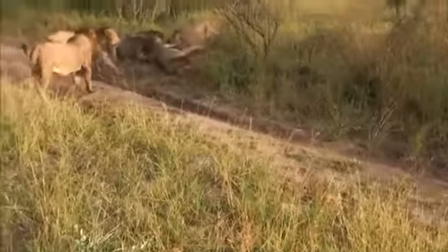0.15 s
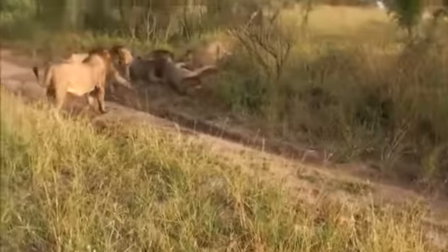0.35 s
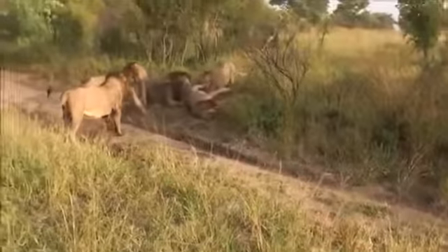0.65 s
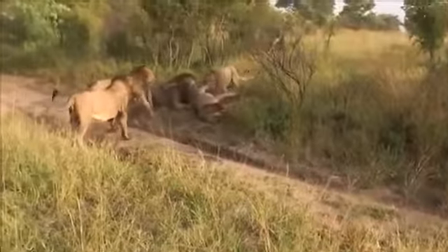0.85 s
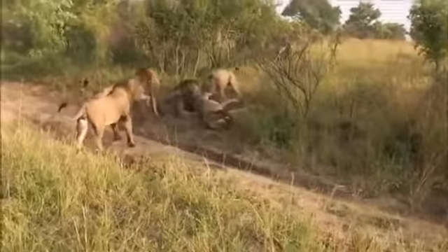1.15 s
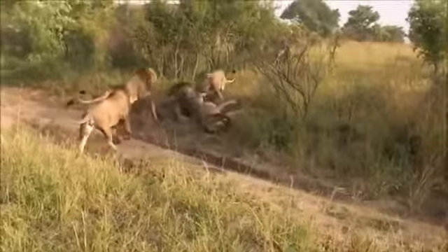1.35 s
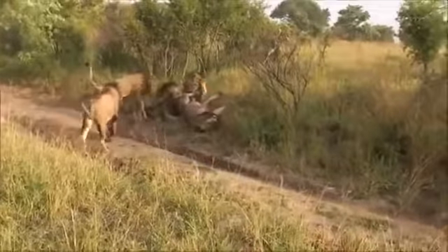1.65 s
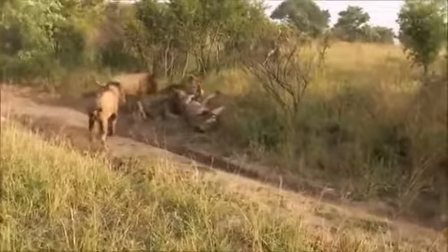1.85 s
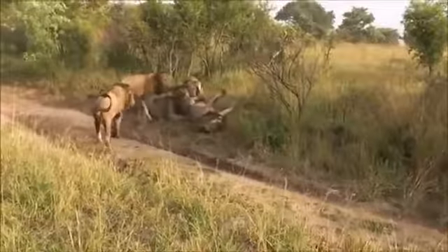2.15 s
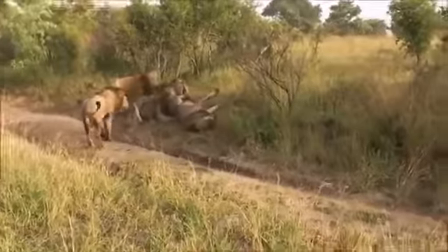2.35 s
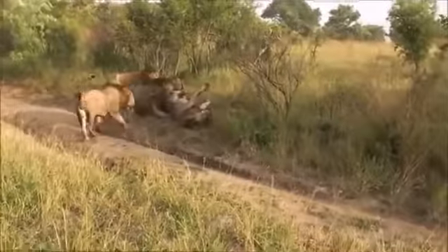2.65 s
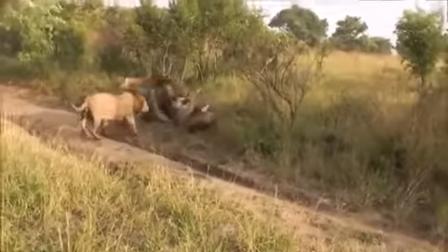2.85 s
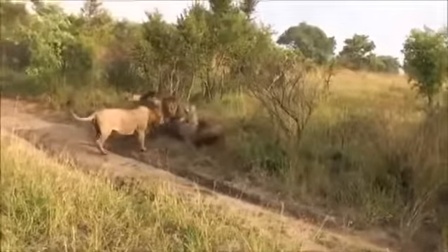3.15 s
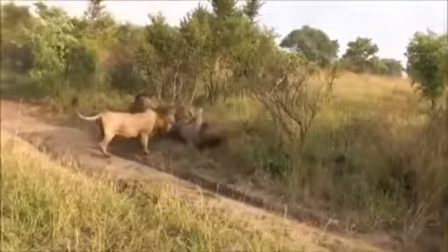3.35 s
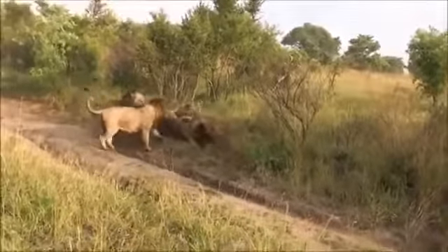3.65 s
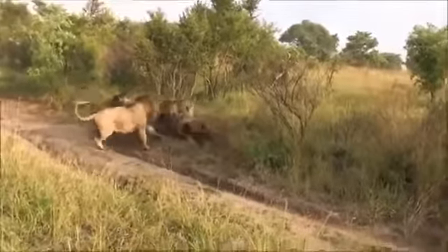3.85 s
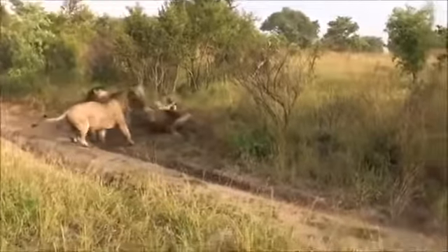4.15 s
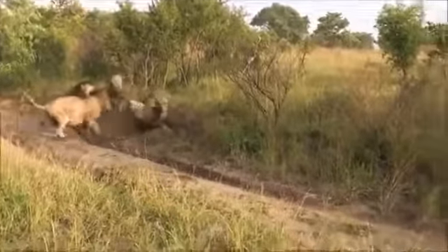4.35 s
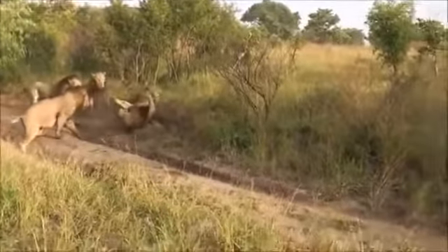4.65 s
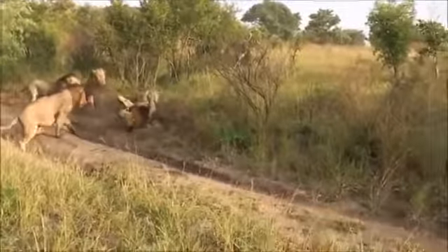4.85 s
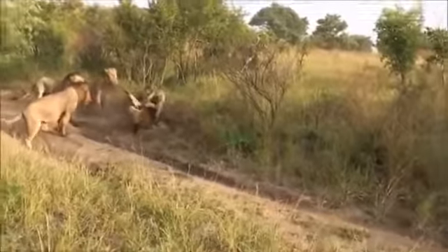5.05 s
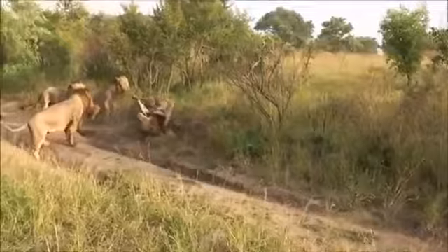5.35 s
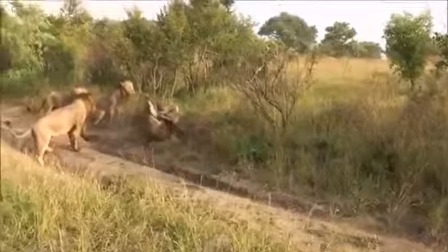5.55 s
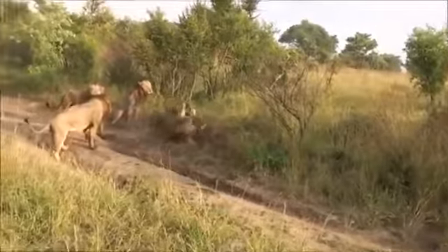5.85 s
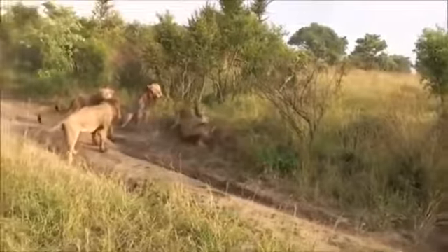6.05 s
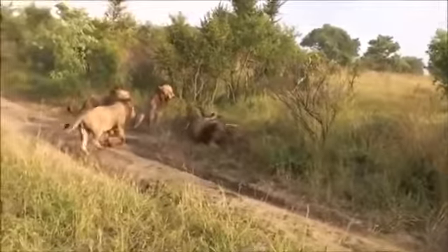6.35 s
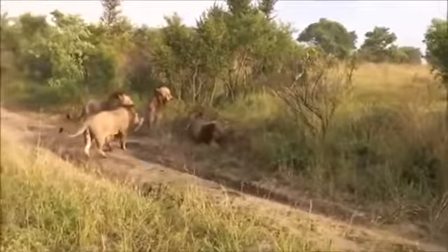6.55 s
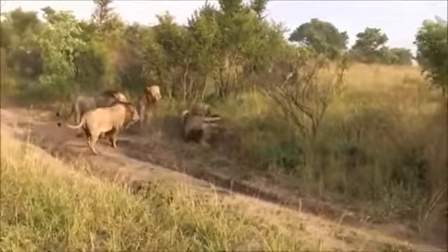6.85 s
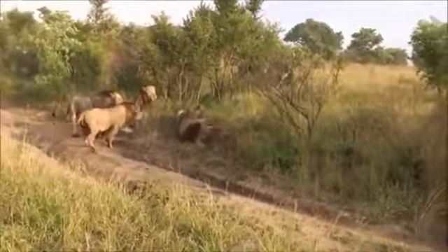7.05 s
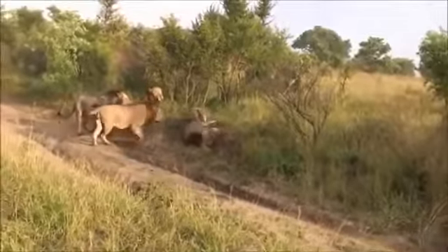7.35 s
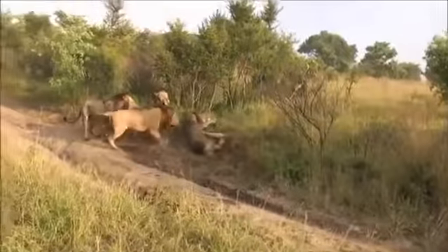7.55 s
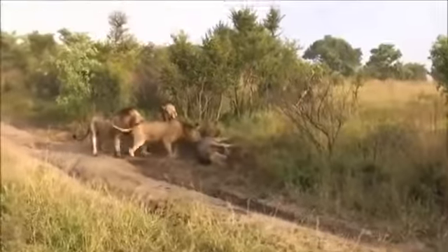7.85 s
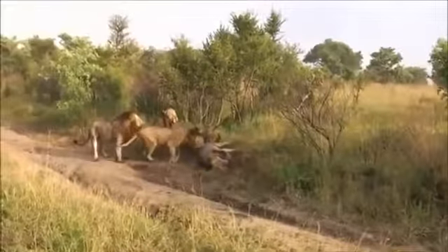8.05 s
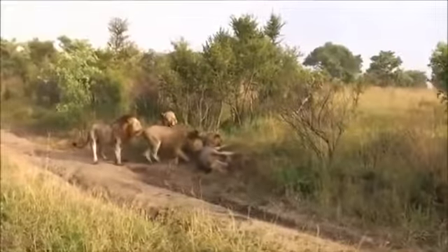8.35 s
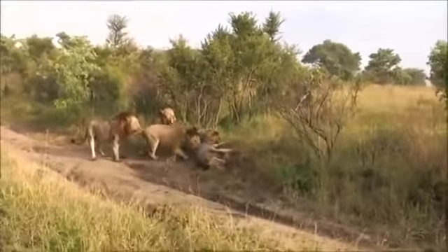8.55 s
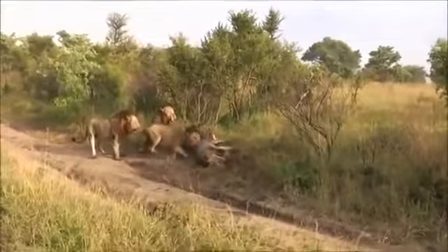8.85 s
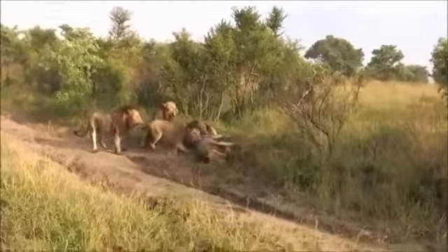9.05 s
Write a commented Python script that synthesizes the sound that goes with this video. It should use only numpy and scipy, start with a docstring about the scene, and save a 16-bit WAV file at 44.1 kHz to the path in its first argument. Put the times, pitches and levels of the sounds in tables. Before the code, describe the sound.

A group of lions fights on a grassy track. A long throaty growl fades, short snarls break in, then a louder growl rises and sinks. A fierce clash follows with moans, hisses and cracking stems. More growling bouts come, a brief lull, then a last sustained growl. Open outdoor air, faint distant birds, lions central and at moderate distance.

```python
"""Lions fighting in dry grassland

Growls are trains of vocal-fold slaps, about 30 per second, ringing gliding throat resonances; strain roughens them.
Snarls are sharp mouth rings with a chest thump; hisses and grumbles are coloured noise; moans are blurred tones.
Dry grass rustles in uneven strokes and stems snap; small birds call far off in open air.
Echo, rustle and treble scatter widen the image; the lions stay central."""
import sys
import numpy as np
from scipy import signal
from scipy.fft import rfft, irfft
from scipy.io import wavfile
from scipy.ndimage import uniform_filter1d

SR = 44100
rng = np.random.default_rng(int(sys.argv[2]) if len(sys.argv) > 2 else 0)


def unload_wav(signal):
    """Save mono or channel-first audio to the path in sys.argv[1] as 16-bit WAV at rate SR, clipped to [-1, 1]."""
    wavfile.write(
        sys.argv[1],
        SR,
        np.round(np.clip(np.atleast_2d(signal).T, -1, 1) * 32767).astype(np.int16),
    )


N = 406161

# Spectra are relative: a filter or a later scaling sets the final level.
# open-air background: f/Hz, relative level/dB
AIR_SPECTRUM = [(15, -52), (25, -46.5), (176, 14), (318, -5.5), (927, -7), (1120, 2), (1390, -15),
                (3440, -17), (4750, -13), (5420, -17), (10600, -23), (15000, -31.5)]
# distant bird calls: t/s, length/s, start f/Hz, end f/Hz, width/Hz, level/dB
BIRD_CALLS = [(1.378, 0.49, 4550, 4650, 348, -56), (5.97, 0.14, 3420, 3420, 60, -50),
              (6.085, 0.16, 4580, 4580, 297, -54.5)]
# thicket echo decay: f/Hz, t60/s
THICKET_T60 = [(100, 0.42), (300, 0.27), (1000, 0.19), (3000, 0.37), (10000, 0.14)]
# grass rustle: f/Hz, relative level/dB
GRASS_SPECTRUM = [(60, -3.5), (400, 16.5), (1500, 11), (3000, 4.5), (5000, 0.5), (7000, 0), (9000, -7.5),
                  (12000, -9.5), (15000, -26)]
# bodies thrashing in dry grass: start t/s, hold/s, relative level/dB
SCUFFLES = [(0, 0.014, -42), (1.2, 0.25, -47), (2.2, 0.31, -52), (2.95, 0.21, -47.5), (3.4, 0.8, -40),
            (4.62, 0.13, -37), (5.3, 0.22, -40), (6.1, 0.25, -48.5), (6.72, 0.12, -46)]
# dry stems snapping: t/s, relative peak level/dB
SNAPS = [(3.025, -33.5), (3.108, -30.5), (3.169, -29.5), (3.6776, -29), (3.7303, -27), (4.7447, -30.5),
         (4.827, -27.5), (5.405, -33)]
# stem crack: f/Hz, relative level/dB
SNAP_SPECTRUM = [(500, -8), (2500, 2), (6000, 1.5), (9000, -7), (15000, -23)]
# low rough grumbles of the other lions: start t/s, hold/s, relative level/dB
GRUMBLES = [(1.22, 0.057, -26), (3.52, 0.07, -13), (3.8, 0.42, -16.5), (4.3, 0.14, -17.5),
            (4.58, 0.0075, -20), (4.94, 0.21, -26), (5.37, 0.31, -19.5), (6.22, 0.028, -25),
            (7.5, 0.17, -30)]
# grumble noise: f/Hz, relative level/dB
GRUMBLE_SPECTRUM = [(30, -72), (60, -51), (110, -5), (165, 1), (220, -3.5), (300, -16), (600, -20),
                    (1500, -62.5)]
# hisses through an open mouth: start t/s, hold/s, relative level/dB
HISSES = [(1.26, 0.1, -44.5), (3.5, 0.068, -30.5), (4.61, 0.021, -40), (5.42, 0.26, -34.5),
          (6.64, 0.31, -35), (7.54, 0.23, -34.5), (7.86, 0.073, -35.5), (8.17, 0.058, -36.5)]
# hiss noise: f/Hz, relative level/dB
HISS_SPECTRUM = [(150, -44), (400, 9.5), (750, -6), (1080, 5), (1500, 2.5), (1900, -6.5), (2800, -8.5),
                 (3600, -11.5), (7000, -24), (15000, -47)]
# strained moans: t/s, length/s, start f/Hz, end f/Hz, width/Hz, level/dB
MOANS = [(4.02, 0.15, 514.8, 536, 28, -24.5), (4.11, .2, 814.6, 710, 25, -29),
         (4.23, 0.22, 1000, 1060, 35, -30), (4.26, 0.19, 520, 452.5, 40, -30),
         (4.5, 0.132, 401.7, 423, 40, -28), (4.915, 0.093, 117.4, 168, 20, -21.5),
         (7.62, 0.38, 177.7, 154, 21.7, -37)]
# rasps through bared teeth: t/s, relative peak level/dB, mouth ring f/Hz
SNARLS = [(1.2108, -26.5, 2370), (1.2252, -21, 2140), (1.2463, -22.5, 1880), (1.2584, -20.5, 2020),
          (1.2854, -26, 2620), (1.3149, -27, 2230), (1.3304, -36, 2340), (1.3513, -29, 2470),
          (1.44, -33, 2050), (1.476, -30, 2130), (3.5282, -15, 2770), (3.5549, -14.5, 2350),
          (3.5802, -13, 2360), (3.6435, -23.5, 3020), (4.7584, -29, 2680), (4.9628, -15.5, 2580),
          (5.465, -28, 2590), (5.492, -18, 2470), (5.6709, -15.5, 2550), (5.7012, -14.5, 2650),
          (5.733, -13.5, 2675), (5.7694, -18, 2680), (5.8029, -16, 2530), (6.2124, -24, 2700),
          (6.2402, -18.5, 2620), (6.8001, -15, 2667), (6.879, -18, 2330), (6.934, -16.5, 2600),
          (6.9637, -21.5, 2820), (6.9851, -22, 2510), (7.3218, -35.5, 2601), (7.4512, -29, 2640)]
# one curve per growl: t/s, slap rate/Hz, relative level/dB, strain/0-1
GROWLS = [
    [(-0.009, 30, -11.5, 0.2), (.112, 30.3, -14, 0.01), (0.263, 31.5, -13.5, 0.22), (0.504, 31, -14, 0.39),
     (0.656, 29.2, -13.5, 0.28), (0.884, 27.6, -12, 0.27), (1.055, 27.7, -13, 0.36),
     (1.091, 26.4, -12.5, 0.54), (1.135, 22, -22, 0.01)],
    [(1.713, 31, -26, 0), (1.743, 27, -14.5, 0.4), (1.777, 30, -8, 0.2), (2.047, 33.2, -8, 0),
     (2.249, 35, -10.5, 0.08), (2.462, 37, -12, 0), (2.595, 35.8, -15, 0.07), (2.729, 35.7, -13.5, 0.03),
     (2.891, 34, -15, 0.33), (3.05, 28.5, -19, 0.3), (3.25, 24.4, -17.5, 0.4), (3.352, 4, -20, 0.64)],
    [(3.479, 46, -25, 0.74), (3.519, 44, -10, 0.36), (3.581, 34.3, -17.5, 0.42), (3.681, 27, -16.5, 0.4),
     (3.714, 34, -11.5, 0.5)],
    [(3.733, 33, -9, 0.56), (3.849, 33.4, -12, 0.32), (3.979, 33.3, -11, 0.15), (4.041, 38, -11.5, 0.55),
     (4.163, 36, -15.5, 0.52), (4.217, 34.3, -15.5, 0.5), (4.375, 36.4, -18, 0.3), (4.435, 33, -13.5, 0.4),
     (4.519, 34, -22, 0.5), (4.602, 37.4, -19, 0.4)],
    [(5.015, 25, -21, 0.02), (5.049, 28, -9.5, 0.17), (5.182, 28.8, -7, 0.09), (5.307, 31.3, -10.5, 0.1),
     (5.396, 35.2, -12.5, 0.43), (5.5, 39.3, -15, 0.7), (5.587, 34, -14.5, 0.64),
     (5.695, 27.5, -14.5, 0.57), (5.814, 25.7, -17, 0.32), (5.894, 26.3, -16, 0.13),
     (6.137, 24.2, -16, 0.22)],
    [(6.267, 43, -29, 0.45), (6.347, 44.7, -24.5, 0), (6.374, 35.5, -17.5, 0.21), (6.429, 38, -17.5, 0.03),
     (6.495, 28.3, -22, 0.5)],
    [(6.537, 27, -15, 0.11), (6.683, 31, -7, 0.04), (6.747, 37, -7, 0.13), (6.801, 44, -8, 0.34),
     (6.877, 40.6, -15.5, 0.3), (6.931, 40, -12, 0.29), (6.971, 24, -18, 0.29), (7.097, 24.3, -19, 0.45),
     (7.149, 22, -29, 0.01)],
    [(6.833, 33.5, -13.5, .3), (6.895, 31, -17.5, 0.1)],
    [(7.932, 29, -10, 0.05), (8.161, 27.4, -14, 0.47), (8.316, 30.1, -12, 0.48), (8.461, 31.7, -13, 0.19),
     (8.638, 32.8, -15, 0.18), (8.848, 35.6, -13.5, 0.1), (8.998, 28.3, -14.5, 0.27),
     (9.182, 30.6, -12.5, 0.41)],
]
# jaw and larynx resonances, one curve per growl in the same order; levels relative to the first resonance,
# before PART_TRIM_DB: t/s, first f/Hz, throat f/Hz, throat level/dB, back-of-mouth f/Hz,
# back-of-mouth level/dB, mouth f/Hz, mouth level/dB, rasp level/dB (no trim)
VOICES = [
    [(0.05, 220, 571, -4.5, 730, -15, 1620, -44, -29.5), (0.32, 226, 547, -2.5, 724, -12.5, 1430, -26, -25),
     (0.5, 214, 549, -2, 720, -16.5, 1270, -28.5, -27.5),
     (0.75, 213, 562, -8, 732.4, -16.5, 1120, -25, -24),
     (0.92, 205, 586, -8.5, 880, -23.5, 1060, -27, -29.5),
     (1.1, 199, 573, -6.5, 885, -25.5, 1120, -36, -28.5)],
    [(1.78, 214, 514, -8.5, 755, -25, 1280, -28.5, -24.5),
     (1.93, 219, 532, -9.5, 747.5, -34, 1240, -29.5, -34), (2.1, 234.5, 547, -11, 773, -22, 1280, -31, -29),
     (2.33, 218.5, 546.7, -5, 757, -16, 1560, -27.5, -25),
     (2.62, 230.3, 583, -4.5, 750, -12.5, 1540, -31, -25),
     (2.82, 223.3, 578, -4.5, 798, -11.5, 1470, -25, -27),
     (2.95, 233, 557.3, -10, 790, -24, 1270, -20, -28), (3.15, 206, 526, -18, 760, -48, 1210, -41, -22)],
    [(3.53, 164.8, 534, -15, 1090, -21, 1472, -22, -39), (3.66, 190, 525, -17, 786, -26, 1154, -17.5, -45)],
    [(3.76, 225.9, 514, -13, 795, -16, 1100, -19.5, -29.5),
     (3.95, 242, 523, -15.5, 810, -12, 950, -16, -31.5),
     (4.08, 194, 525.6, -5.5, 690, -12, 1050, -14.5, -29),
     (4.15, 197.3, 536, -8, 740.4, -5.5, 1070, -13, -22), (4.21, 182, 497, -20, 730, -3, 1020, -8.5, -21),
     (4.3, 191, 482.2, -5, 760, -12, 1036, -14, -34),
     (4.43, 187.2, 483, -11.5, 720.4, -13.5, 1027, -9, -24),
     (4.52, 195.2, 405.6, -6, 690, -27, 988, -25, -41), (4.6, 200, 416, -10, 870, -14, 1050, -27, -32)],
    [(5.06, 224, 510, -15, 817, -23.5, 1000, -18.5, -31.5),
     (5.18, 230, 514, -23, 845, -23, 1030, -21, -36.5),
     (5.32, 233.1, 504.7, -16.5, 795, -13.5, 1000, -12.5, -29.5),
     (5.47, 205.3, 490.5, -3.5, 850, -11, 1080, -16, -31), (5.58, 240, 536, -18, 782, -7.5, 1006, -11, -29),
     (5.7, 222.2, 550, -10, 770, -12.5, 999.4, -15, -47),
     (5.84, 210.2, 553, -16, 791.5, -12, 1020, -20, -28),
     (6.05, 205.5, 531.6, -27, 839, -26, 1280, -26, -28.5)],
    [(6.32, 246, 379.4, -10, 1040, -5.5, 1432, -18, -39), (6.41, 240, 374, -6, 1101, 0, 1420, -12, -38),
     (6.49, 257, 385.4, -9, 1047, -5.5, 1350, -15, -28)],
    [(6.58, 192.8, 399, -10, 896, -22, 1260, -28, -33), (6.73, 205, 395, -18.5, 1058, -33, 1420, -31, -32),
     (6.81, 212.5, 414.7, -10, 1009, -12.5, 1330, -12, -26.5),
     (6.905, 194, 424.7, -12, 979, -14, 1300, -24, -39), (6.94, 199.6, 474, -15, 704, -20, 1350, -29, -32),
     (7.07, 212, 430, -11, 860, -31, 1350, -28, -31)],
    [(6.86, 254.4, 375.5, -5, 595, -20, 990, -25, -40)],
    [(7.96, 199, 402.6, -9, 580.5, -6.5, 952.5, -24, -30.5),
     (8.1, 205, 404.8, -7.5, 592, -7.5, 955.3, -19.5, -37),
     (8.3, 218, 443, -7.5, 623, -14.5, 970, -22.5, -30), (8.39, 222.1, 495.6, -1, 699, -22, 995, -27, -29),
     (8.52, 238, 552, -2.5, 720.6, -12.5, 1120, -27.5, -32),
     (8.66, 232.8, 538.6, -3.5, 730, -12.5, 1070, -26.5, -29),
     (8.97, 240.2, 537, -1.5, 760, -15.5, 1010, -20.5, -28),
     (9.17, 222.8, 521, -6.5, 722, -21, 1047, -21.5, -33.5)],
]
# front-of-mouth resonance as the lips move: t/s, f/Hz
FRONT_CURVE = [(0, 2380), (.5, 2160), (.9, 2480), (1.9, 2390), (2.42, 2190), (2.9, 2291), (3.6, 2500),
               (4.3, 2320), (5.6, 2570), (7.95, 2619), (8.9, 2440)]
# broad colour of the growl's rasp: f/Hz, relative level/dB
RASP_SPECTRUM = [(300, -32), (1200, -5.5), (1900, -3), (2400, 3.5), (2900, 3.5), (3450, -11), (4100, -4.5),
                 (5500, -12.5), (7200, -11.5), (10000, -23.5), (15000, -55.5)]

AIR_DB, TREAD_DB = -46.5, -51  # tread: faint rustle of paws, always under the scuffles
GRASS_PATCHY_DB, GRASS_PATCH_S = 4, 0.063  # rms depth and smoothing of the strokes
SCUFFLE_ATTACK_S, SCUFFLE_RELEASE_S = 0.6, 0.3
GRUMBLE_ATTACK_S, GRUMBLE_RELEASE_S = 0.084, 0.053
HISS_ATTACK_S, HISS_RELEASE_S = 0.072, 0.077
SNAP_TRIM_DB, SNARL_TRIM_DB, PART_TRIM_DB = 9.5, 1.5, -0.3  # added to table levels
CHEST_HZ, CHEST_WIDTH_HZ, CHEST_DB = 164, 64, -0.5  # level relative to the snarl's rasp
RING_WIDTH_HZ, STRAIN_WIDTH_HZ = 22.9, 31  # first resonance: easy voice, full-strain extra
THROAT_WIDTH, BACK_WIDTH, MOUTH_WIDTH = 0.15, 0.14, 0.15  # share of resonance frequency
CORE_WIDTH, CORE_POWER = 0.058, 0.82  # long-ringing core: share of frequency, relative peak power
FRONT_WIDTH_HZ, FRONT_CORE_HZ = 370, 70
WOBBLE, FRONT_WOBBLE = 0.039, 0.03  # rms frequency share per slap: at full strain, at any strain
EDDY_S, STRAIN_EDDY_S = 0.0065, 0.007  # turbulence after a slap, full-strain extra
STUTTER_STRAIN, STUTTER_DB, STUTTER_GAP_S = 0.35, -7, 0.009  # threshold, echo slap level, mean gap
EDGE_HZ = 15200
SIZE = 4096  # ring length, samples
HZ = np.fft.rfftfreq(SIZE, 1 / SR)
RING_S = np.arange(SIZE) / SR
FADE = np.minimum(1, 2 - 2 * np.arange(SIZE) / SIZE) ** 2  # fades the second half of every ring


def gain_of(db):
    """Amplitude gain of a level in dB."""
    return 10 ** (np.asarray(db) / 20)


def evened(x):
    """Scales to rms 1."""
    return x / np.sqrt(np.mean(x ** 2) + 1e-20)


def unit(x):
    """Scales to energy 1."""
    return x / np.sqrt(np.sum(x ** 2, -1, keepdims=True) + 1e-20)


def colour(points, hz):
    """Gain of a (Hz, dB) spectrum, interpolated on a log-frequency axis."""
    f, db = np.transpose(points)
    return gain_of(np.interp(np.log(hz + 1), np.log(f + 1), db))


def follow(rows, t):
    """Every column of a curve table at times t."""
    s, *columns = np.transpose(rows)
    return [np.interp(t, s, c) for c in columns]


def add(mix, s, sound):
    """Adds a sound into mix at s seconds, clipped to its ends."""
    start = round(s * SR)
    sound = sound[max(-start, 0):]
    part = mix[max(start, 0):][:len(sound)]
    part += sound[:len(part)]


def shaped(x, points):
    """x filtered by a spectrum, at rms 1."""
    return evened(irfft(rfft(x) * colour(points, np.fft.rfftfreq(N, 1 / SR)), N))


def fold_back(x):
    """Moves the part before time zero to after it."""
    return x * np.r_[1, np.full(SIZE // 2 - 1, 2), 1, np.zeros(SIZE // 2 - 1)]


def causal(gain):
    """Minimum-phase spectrum: the sharpest-starting ring with this gain."""
    return np.exp(rfft(fold_back(irfft(np.log(gain + 1e-6)))))


def ring(gain, drive):
    """A drive through the minimum-phase filter of this gain."""
    return signal.fftconvolve(irfft(causal(gain)), drive)[:SIZE] * FADE


def peak(hz, width):
    """Power curve of a steep resonance."""
    return 1 / (1 + (2 * (HZ - hz) / width) ** 2) ** 2


def formant(hz, width):
    """Power curve of a throat resonance with a long-ringing core; higher ones die sooner."""
    return peak(hz, width * hz) + CORE_POWER * peak(hz, CORE_WIDTH * hz)


def puff(decay_s):
    """A short burst of turbulence, energy 1."""
    return unit(rng.standard_normal(SIZE) * np.exp(-RING_S / decay_s))


def swells(events, attack_s, release_s):
    """Gain over time of events that each rise, hold and die away."""
    t = np.arange(N) / SR
    total = np.zeros(N)
    for s, hold, db in events:
        rise = np.clip(1 + (t - s) / attack_s, 0, 1) ** 2  # full at s
        fall = np.clip(1 - (t - s - hold) / release_s, 0, 1) ** 2
        total += gain_of(db) * rise * fall
    return total


def open_air():
    """Steady broadband noise with the open-air spectrum."""
    return gain_of(AIR_DB) * shaped(rng.standard_normal(N), AIR_SPECTRUM)


def whistles(calls):
    """Blurred tones: noise in one narrow resonance, gliding over each call."""
    out = np.zeros(N)
    for s, length, start_hz, end_hz, width, db in calls:
        count = int(length * SR)
        a, b = rng.standard_normal((2, count + SIZE - 1))
        blur = signal.fftconvolve(a + 1j * b, irfft(causal(np.sqrt(peak(0, width)))), "valid")
        turns = np.cumsum(np.linspace(start_hz, end_hz, count)) / SR
        call = (blur * np.exp(2j * np.pi * turns)).real
        add(out, s, gain_of(db) * evened(call * signal.windows.tukey(count, 0.5)))
    return out


def thicket(x):
    """Faint scatter from bushes and trees: sparse taps, each band decaying at its own rate."""
    taps = rng.standard_normal(SR) * (rng.random(SR) < 2500 / SR)
    taps *= np.arange(SR) > 0.012 * SR  # first reflection after 12 ms
    hz, t, z = signal.stft(taps, SR, nperseg=256)
    t60 = follow(THICKET_T60, hz)[0][:, None]
    tail = signal.istft(z * gain_of(-60 * t / t60), SR, nperseg=256)[1]
    return signal.fftconvolve(x, unit(tail))[:N]


def grass():
    """Brushing blades as noise with sparse crackles, swelling per scuffle; rows are centre and sides."""
    sizes = gain_of(5.2 * np.minimum(rng.exponential(1, (2, N)), 4))
    crackles = sizes * (rng.random((2, N)) < 700 / SR) * rng.choice([-1, 1], (2, N))
    brush = rng.standard_normal((2, N)) + 0.65 * evened(crackles)
    strokes = evened(uniform_filter1d(rng.standard_normal(N), size=int(GRASS_PATCH_S * SR)))
    level = gain_of(TREAD_DB) + swells(SCUFFLES, SCUFFLE_ATTACK_S, SCUFFLE_RELEASE_S)
    return shaped(brush, GRASS_SPECTRUM) * gain_of(GRASS_PATCHY_DB * strokes) * level


def snaps():
    """Stems breaking under the paws: short noise puffs through the crack spectrum."""
    out = np.zeros(N)
    for s, db in SNAPS:
        crack = ring(colour(SNAP_SPECTRUM, HZ), puff(0.0047))
        add(out, s, gain_of(db + SNAP_TRIM_DB) * crack / abs(crack).max())
    return out


def rushes(level, points, flutter):
    """Air forced through a throat, fluttering as loose tissue flaps."""
    flap = evened(uniform_filter1d(rng.standard_normal(N), size=500))
    return level * shaped(rng.standard_normal(N), points) * evened(np.exp(flutter * flap))


def grumbles():
    """Low throat noise with slight flutter."""
    level = swells(GRUMBLES, GRUMBLE_ATTACK_S, GRUMBLE_RELEASE_S)
    return rushes(level, GRUMBLE_SPECTRUM, flutter=0.05)


def hisses():
    """Open-mouth noise with strong flutter."""
    return rushes(swells(HISSES, HISS_ATTACK_S, HISS_RELEASE_S), HISS_SPECTRUM, flutter=0.42)


def snarls():
    """Each rasp is a sharp crack that rings the open mouth and thumps the chest."""
    out = np.zeros(N)
    thump = ring(np.sqrt(peak(CHEST_HZ, CHEST_WIDTH_HZ)), [1])
    thump = gain_of(CHEST_DB) * thump / abs(thump).max()
    for s, db, hz in SNARLS:
        mouth = np.sqrt(peak(hz, 490) + 1.27 * peak(1350, 700) + 0.0004 * peak(2 * hz, 7100))
        burst = ring(mouth, puff(0.0041)) + 0.5 * ring(mouth, [1])
        add(out, s, gain_of(db + SNARL_TRIM_DB) * (burst / abs(burst).max() + thump))
    return out


def slap_times(rows):
    """The folds close a whole number of times from row to row, spaced by the rate curve."""
    times = [rows[0][0]]
    for before, after in zip(rows, rows[1:]):
        t = np.linspace(before[0], after[0], num=200)
        turns = np.cumsum(follow(rows, t)[0]) * (t[1] - t[0])
        count = max(round(turns[-1]), 1)
        times += list(np.interp(np.linspace(0, turns[-1], count + 1)[1:], turns, t))
    return times


def throat_power(voice, front_hz, rough):
    """Power spectrum of one slap: five resonant parts, shaken by strain."""
    first_hz, throat_hz, throat_db, back_hz, back_db, mouth_hz, mouth_db, rasp_db = voice
    a, b, c, d, e = rng.standard_normal(5)
    first_hz = first_hz * (1 + WOBBLE * rough * a)
    throat_hz = throat_hz * (1 + WOBBLE * rough * b)
    back_hz = back_hz * (1 + 2 * WOBBLE * rough * d)
    front_hz = front_hz * (1 + FRONT_WOBBLE * e)  # lips and tongue shift
    width = RING_WIDTH_HZ + STRAIN_WIDTH_HZ * rough
    first = 1 / ((1 - (HZ / first_hz) ** 2) ** 2 + (HZ * width / first_hz ** 2) ** 2)
    throat = formant(throat_hz, THROAT_WIDTH) + 0.43 * peak(0.751 * throat_hz, 120)
    back = formant(back_hz, BACK_WIDTH) + 0.3 * peak(0.888 * back_hz, 120)
    mouth = formant(mouth_hz, MOUTH_WIDTH)
    mouth = mouth + 0.083 * peak(mouth_hz, 570) + 0.072 * peak(1.28 * mouth_hz, 150)
    rasp = colour(RASP_SPECTRUM, HZ) ** 2
    rasp = rasp + 7 * peak(front_hz, FRONT_WIDTH_HZ) + 9 * peak(front_hz, FRONT_CORE_HZ)
    rasp = rasp + 0.82 * peak(1.2 * front_hz, 180) + 1.4 * peak(1.76 * front_hz, 190)
    parts = [(first, 0), (throat, throat_db + PART_TRIM_DB), (back, back_db + PART_TRIM_DB),
             (mouth, mouth_db + PART_TRIM_DB), (rasp, rasp_db + 2.58 * c)]
    power = sum(gain_of(db) ** 2 * shape / shape.mean() for shape, db in parts)
    return power / (1 + (80 / (HZ + 1)) ** 14)  # the mouth radiates little deep bass


def slap(voice, front_hz, rough, eddies):
    """One fold closure rings the long throat; eddies after it roughen the ring, the treble most."""
    power = throat_power(voice, front_hz, rough)
    airy = np.clip(0.55 * rough + 0.8 / (1 + (1400 / (HZ + 1)) ** 3), 0, 1)
    trip = np.exp(-2j * np.pi * HZ * 0.00452)  # part leaves one throat round trip later
    closure = unit(irfft(1 + 0.16 * trip))
    rush = unit(eddies * np.exp(-(RING_S / (EDDY_S + STRAIN_EDDY_S * rough)) ** 2))
    # divide out the eddies' broad colour: they give the grain only
    tint = uniform_filter1d(abs(rfft(rush)) ** 2, size=55)
    sound = ring(np.sqrt(power * (1.001 - airy)), closure) + ring(np.sqrt(power * airy / tint), rush)
    return unit(sound) * np.sqrt(power.mean() * 0.019 * SR)


def growls():
    """Slaps through gliding resonances; strain makes them rough and uneven, and doubles some."""
    out = np.zeros(N)
    for rows, voice in zip(GROWLS, VOICES):
        eddies = rng.standard_normal(SIZE)
        for s in slap_times(rows):
            _, db, strain = follow(rows, s)
            rough = np.clip(strain, 0, 1)
            alike = np.clip(0.95 - 0.15 * rough, 0, 1)  # eddy correlation from slap to slap
            eddies = alike * eddies + np.sqrt(1 - alike ** 2) * rng.standard_normal(SIZE)
            sound = slap(follow(voice, s), follow(FRONT_CURVE, s)[0], rough, eddies)
            sound = sound * gain_of(db + 2.5 * rough * rng.standard_normal())
            add(out, s, sound)
            chance, lateness = rng.random(2)
            if chance < 2 * (rough - STUTTER_STRAIN):
                add(out, s + STUTTER_GAP_S * (0.5 + lateness), sound * gain_of(STUTTER_DB))
    return out


def scene():
    """Lions, birds and air central; echo and rustle also spread to the sides."""
    air = open_air()
    birds = whistles(BIRD_CALLS)
    rustle, wide_rustle = grass()
    lions = snaps() + grumbles() + hisses() + whistles(MOANS) + snarls() + growls()
    mid = lions + gain_of(-14.5) * thicket(lions) + rustle + birds + air
    bright = signal.lfilter(*signal.butter(1, 1800, "high", fs=SR), lions)  # leaves scatter the treble most
    scattered = thicket(gain_of(-27.0) * lions + gain_of(-17.5) * bright)
    side = scattered + gain_of(-8.0) * wide_rustle
    return np.array([mid + side, mid - side])


def record(dry):
    """Rounds off peaks near full scale, then low-passes at EDGE_HZ."""
    rounded = dry / (1 + dry ** 8) ** (1 / 8)
    low_pass = signal.firwin(511, EDGE_HZ, window=("kaiser", 9), fs=SR)
    return signal.oaconvolve(rounded, low_pass[None], "same")


dry = scene()
out = record(dry)
unload_wav(out)
```